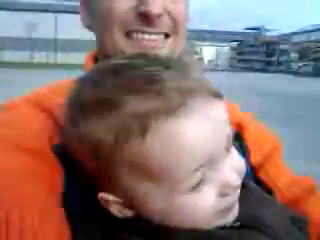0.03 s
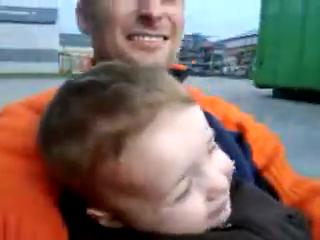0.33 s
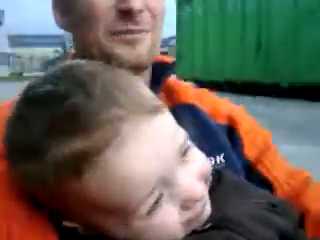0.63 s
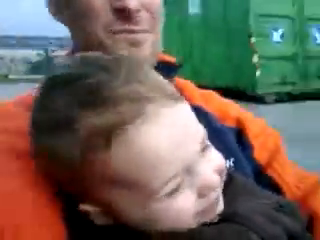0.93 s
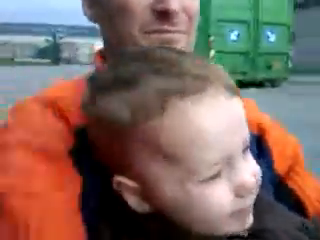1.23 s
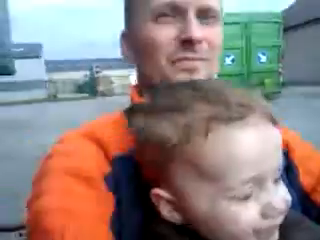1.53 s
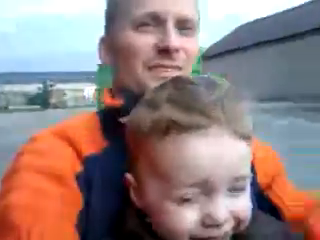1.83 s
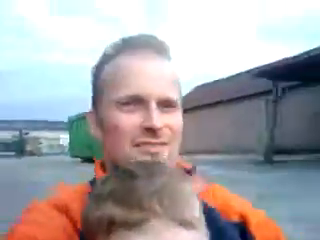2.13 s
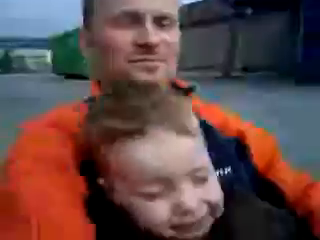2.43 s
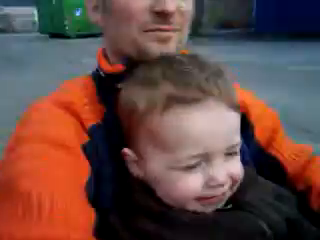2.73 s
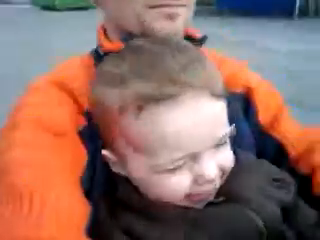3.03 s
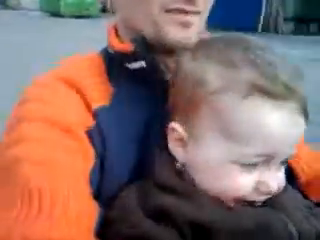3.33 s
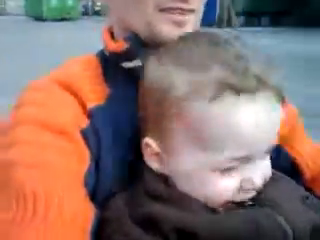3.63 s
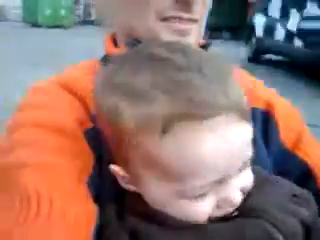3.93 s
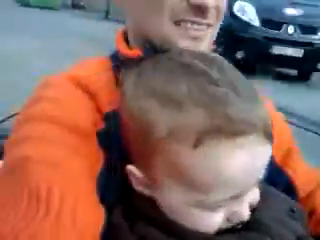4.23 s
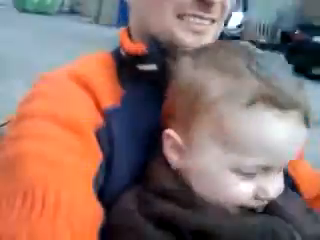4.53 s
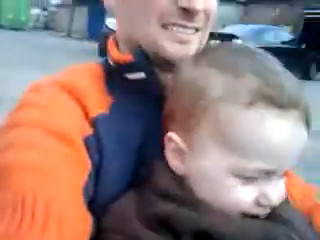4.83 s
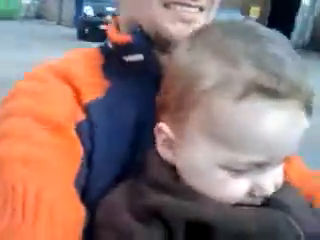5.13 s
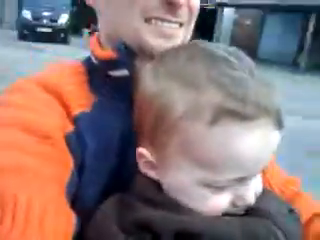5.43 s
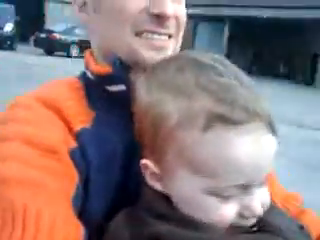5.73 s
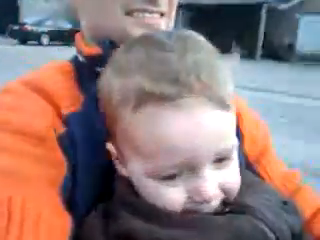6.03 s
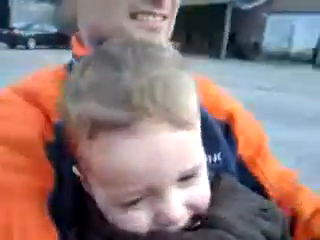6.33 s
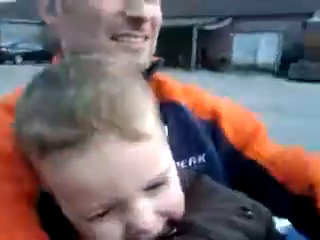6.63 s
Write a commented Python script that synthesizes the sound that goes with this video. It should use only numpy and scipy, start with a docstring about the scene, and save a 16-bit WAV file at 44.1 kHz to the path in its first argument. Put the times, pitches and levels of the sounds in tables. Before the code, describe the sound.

A go-kart rolls over gritty concrete with hiss, buffeting wind and crackles, its tyres screeching in four short, distorted skids.

```python
"""A rolling hiss and buffeting wind, then rasps, crackles and screeching tyres: a go-kart slides round a
concrete yard, heard from the seat through a narrow-band hand-held microphone. Hard wheels hiss and
rumble on grit, driving wind gusts on the microphone, bumps ring the frame. Short rasps and crackles
come singly or in runs: wind crackling on the microphone during the strong gusts, tyre scrub elsewhere.
The tyres screech in four long skids that overload the recorder."""
import sys
import numpy as np
from scipy import signal
from scipy.io import wavfile

SR = 44100
rng = np.random.default_rng(int(sys.argv[2]) if len(sys.argv) > 2 else 0)


def store_wav(level_fs):
    """Save 16-bit WAV to argv[1]."""
    pcm = np.round(np.clip(np.atleast_2d(level_fs), -1, 1) * 32767)
    wavfile.write(sys.argv[1], SR, pcm.T.astype(np.int16))


N = 295028
REST_HZ = 2390   # resonance centre between bursts and between skids


def from_db(db):
    """Decibels to gain."""
    return 10 ** (np.asarray(db) / 20)


def unit_rms(x):
    """Scale to rms 1."""
    return x / np.sqrt(np.mean(x ** 2) + 1e-20)


def curve(rows):
    """Rows of time in seconds and value, interpolated per sample."""
    times_s, values = np.transpose(rows)
    return np.interp(np.arange(N) / SR, times_s, values)


def flutter(rate_hz, depth_db):
    """Random gain of rms 1; its level is low-passed noise with standard deviation depth_db."""
    hop, settle = 20, 4000
    r = np.exp(-2 * np.pi * rate_hz * hop / SR)
    white = rng.standard_normal(N // hop + settle + 2)
    slow = unit_rms(signal.lfilter([1], [1, -2 * r, r * r], white)[settle:])
    drift = np.interp(np.arange(N) / hop, np.arange(len(slow)), slow)
    return unit_rms(from_db(depth_db * drift))


def coloured_noise(spectrum, flicker_db, flicker_hz):
    """Noise bands that each flicker on their own; rms 1."""
    hz, density_db = np.transpose(spectrum)
    edges_hz = np.geomspace(20, 4600, 23)
    white, out = rng.standard_normal((2, N)), 0
    for k, (low, high) in enumerate(zip(edges_hz, edges_hz[1:])):
        band = signal.sosfilt(signal.butter(2, [low, high], "band", fs=SR, output="sos"), white[k % 2])
        gain = from_db(np.interp(np.log(low * high) / 2, np.log(hz), density_db))
        out = out + gain * band * flutter(flicker_hz, flicker_db)
    return unit_rms(out)


def add_resonance(x, centre_hz, width_hz, gain_db):
    """x plus its ringing in a two-pole resonance, steady or moving; rms 1."""
    centre_hz = np.broadcast_to(centre_hz, N)
    r = np.exp(-np.pi * width_hz / SR)
    ring, state, block = np.zeros(N), np.zeros(2), 64
    for i in range(0, N, block):
        poles = [1, -2 * r * np.cos(2 * np.pi * centre_hz[i] / SR), r * r]
        ring[i:i + block], state = signal.lfilter([1, 0, -1], poles, x[i:i + block], zi=state)
    return unit_rms(x + from_db(gain_db) * ring * (1 - r * r) / 2)


def gate(start_s, end_s, edge_s):
    """Sample indices and soft-edged window of one event."""
    at = np.arange(max(int((start_s - edge_s) * SR), 0), min(int((end_s + edge_s) * SR), N))
    inside_s = np.minimum(at / SR - start_s, end_s - at / SR)
    return at, np.clip(inside_s / edge_s + 0.5, 0, 1)


def rolling(hiss_gain_db, rumble_gain_db):
    """Small hard wheels on gritty concrete: grainy hiss with a shrill edge over a low rumble."""
    # Rolling spectra. Each row: frequency in Hz, relative density in dB.
    hiss_spectrum = [(900, -14), (1100, -7.5), (1500, -9.5), (2000, -8.5), (2550, -2.5), (2900, 6.5),
                     (3250, 0), (3550, -8), (4200, -0.5)]
    rumble_spectrum = [(25, -23), (60, -12.5), (150, -8.5), (290, 8.5), (550, -2), (750, -8), (1000, 2),
                       (1500, -8), (3000, -7.5)]
    # Rolling levels. Each row: time in seconds, relative level in dB.
    hiss_levels = [(0, -20), (1.2, -19.5), (2.8, -20.5), (4.0, -18), (5.5, -21), (6.0, -21), (6.69, -23)]
    rumble_levels = [(0, -28.5), (1.1, -26.5), (1.57, -27), (2.8, -24.5), (3.8, -25.5), (4.15, -29),
                     (5.4, -30.5), (5.7, -37.5), (6.69, -35.5)]
    grit = coloured_noise(hiss_spectrum, flicker_db=1.5, flicker_hz=5.6)
    grit *= flutter(rate_hz=97, depth_db=1.7)
    hiss = add_resonance(grit, centre_hz=3277, width_hz=44, gain_db=-0.5)
    hiss *= from_db(curve(hiss_levels) + hiss_gain_db)
    rumble = coloured_noise(rumble_spectrum, flicker_db=2.5, flicker_hz=23)
    rumble *= from_db(curve(rumble_levels) + rumble_gain_db)
    return hiss + rumble


def wind(gain_db):
    """Air over the microphone port: each gust roars at its own pitch; eddies shake all bands together."""
    # Gusts. Each row: start in seconds, length in seconds, relative level in dB, roar centre in Hz.
    gusts = [(0.0, 0.02, -19.5, 550), (0.175, 0.069, -25, 600), (0.811, 0.18, -20.5, 900),
             (1.238, 0.071, -15, 1200), (1.33, 0.13, -13.5, 750), (1.622, 0.32, -15, 600),
             (1.897, 0.15, -12.5, 800), (2.123, 0.47, -15, 420), (2.661, 0.11, -13, 800),
             (2.828, 0.2, -14, 650), (3.142, 0.04, -18.5, 550), (3.269, 0.37, -18, 500),
             (3.929, 0.035, -22.5, 900), (4.203, 0.17, -17, 450), (4.39, 0.55, -20, 430),
             (5.047, 0.17, -17.5, 900), (5.307, 0.019, -21, 500), (5.368, 0.06, -26.5, 450),
             (5.914, 0.056, -20, 500), (6.095, 0.024, -19, 550), (6.178, 0.023, -24, 500)]
    # Wind spectrum. Each row: frequency in Hz, relative density in dB.
    air_spectrum = [(25, -20), (60, -11), (170, -14.5), (300, 0.5), (550, 0), (850, -2), (1400, -4.5),
                    (2300, -4.5), (3300, -16.5), (4200, -5)]
    attack_s, release_s, breeze_db = 0.018, 0.074, -33
    t = np.arange(N) / SR
    flow = np.full(N, from_db(breeze_db))
    centre_hz = np.full(N, np.mean([hz for *_, hz in gusts]))
    for start_s, length_s, level_db, hz in gusts:
        end_s = start_s + length_s
        corners_s = [start_s - attack_s / 2, start_s + attack_s / 2, end_s, end_s + release_s]
        gust = from_db(level_db) * np.interp(t, corners_s, [0, 1, 1, 0])
        centre_hz[gust > flow] = hz
        flow = np.maximum(flow, gust)
    air = coloured_noise(air_spectrum, flicker_db=2.5, flicker_hz=30)
    roar = add_resonance(air, centre_hz, width_hz=450, gain_db=-6)
    eddies = flutter(rate_hz=70, depth_db=2.07)
    return from_db(gain_db) * flow * roar * eddies


def burst_runs():
    """Rasps and crackles in a rough, slightly fading rhythm; returns one row per burst."""
    # Runs. Each row: start in seconds, length in seconds, burst rate in Hz,
    # sounding share of a cycle, relative level in dB, centre in Hz.
    runs = [(0.202, 0.14, 32.5, 0.29, -10.5, 2470), (0.836, 0.12, 58.6, 0.28, -13.5, 2430),
            (1.735, 0.056, 50, 0.3, -9, 1900), (1.871, 0.135, 27, 0.45, -10, 1710),
            (2.138, 0.13, 29, 0.4, -14, 2260), (2.37, 0.087, 27, 0.32, -12.5, 2440),
            (2.539, 0.06, 45, 0.75, -11.5, 2350), (2.886, 0.035, 112, 0.6, -11, 2080),
            (3.1, 0.11, 56.5, 0.5, -10.5, 2940), (4.238, 0.07, 43.6, 0.75, -11, 2930),
            (4.326, 0.095, 31, 0.83, -10, 2700), (4.708, 0.15, 20, 0.55, -9, 2850),
            (4.887, 0.081, 31.8, 0.89, -9.5, 2850), (5.277, 0.075, 33.6, 0.55, -11, 2780)]
    fade_db, spread_db, jitter_cycles, log_stretch = 1.5, 0.14, 0.061, 0.22
    rows = []
    for start_s, length_s, rate_hz, share, level_db, hz in runs:
        for cycle, (late, weak, long) in enumerate(rng.standard_normal((40, 3))):
            progress = cycle / (length_s * rate_hz)
            if progress < 1:
                onset_s = start_s + (cycle + jitter_cycles * late) / rate_hz
                burst_s = min(share * np.exp(log_stretch * long), 1) / rate_hz
                burst_db = level_db - fade_db * progress - spread_db * weak
                rows.append((onset_s, burst_s, burst_db, hz))
    return rows


def rasps_and_crackles(gain_db):
    """Short bursts: wind crackling on the microphone in the strong gusts, tyre scrub elsewhere."""
    # Single bursts. Each row: start in seconds, length in seconds, relative level in dB, centre in Hz.
    single_bursts = [(0.226, 0.014, -8.5, 2430), (0.506, 0.0095, -12, 2350), (0.819, 0.0038, -9, 2800),
                     (0.973, 0.023, -9.5, 2400), (1.211, 0.0063, -14, 3060), (1.245, 0.04, -12.5, 2060),
                     (1.345, 0.023, -11.5, 2200), (1.385, 0.019, -17, 1785), (1.445, 0.0093, -8.5, 2620),
                     (1.505, 0.0071, -11, 1514), (1.626, 0.015, -13, 1900), (1.836, 0.0093, -19, 1800),
                     (2.036, 0.018, -9.5, 2080), (2.087, 0.0095, -9.5, 1780), (2.632, 0.008, -13, 1870),
                     (2.71, 0.0063, -7, 2490), (2.745, 0.034, -11, 2520), (3.226, 0.043, -6.5, 3130),
                     (3.648, 0.019, -10.5, 2800), (3.812, 0.0057, -10.5, 2260), (4.86, 0.0077, -11.5, 3070),
                     (5.005, 0.0049, -8, 2820), (5.028, 0.01, -16, 2550), (5.919, 0.0028, -14.5, 2510),
                     (5.965, 0.011, -9.5, 3270), (6.098, 0.0124, -17, 3030)]
    # Burst spectrum. Each row: frequency in Hz, relative density in dB.
    burst_spectrum = [(25, -11), (70, -10.5), (200, -10), (500, -6), (1000, -3.5), (2000, -3.5),
                      (3100, -1.5), (4200, 0)]
    noise = coloured_noise(burst_spectrum, flicker_db=4, flicker_hz=22)
    noise *= flutter(rate_hz=153, depth_db=0.58)
    envelope, centre_hz = np.zeros(N), np.full(N, float(REST_HZ))
    for start_s, length_s, level_db, hz in [*single_bursts, *burst_runs()]:
        at, window = gate(start_s, start_s + length_s, edge_s=0.0014)
        envelope[at] += from_db(level_db + gain_db) * window
        centre_hz[at] = hz
    return envelope * add_resonance(noise, centre_hz, width_hz=730, gain_db=6)


def bumps(gain_db):
    """Bumps in the concrete ring the frame's low modes, each at a scattered strength."""
    # Jolts. Each row: time in seconds, relative peak in dB.
    jolts = [(0.753, -13), (0.809, -11.5), (0.825, -16), (0.905, -14), (1.12, -13.5), (1.145, -12),
             (3.673, -14)]
    # Frame modes. Each row: frequency in Hz, relative level in dB, T60 in seconds.
    frame_modes = [(253, -8.5, 0.15), (317, 0, 0.092), (413, -18, 0.042), (596, -5, 0.048)]
    times_s, peak_db = np.transpose(jolts)
    spread_db = rng.normal(0, 2.2, (len(jolts), len(frame_modes)))
    out = np.zeros(N)
    for k, (hz, level_db, t60_s) in enumerate(frame_modes):
        impulses = np.full(N, 1e-18)   # floor avoids denormals
        impulses[(times_s * SR).astype(int)] = from_db(peak_db + level_db + gain_db + spread_db[:, k])
        r, w = np.exp(-np.log(1000) / (t60_s * SR)), 2 * np.pi * hz / SR
        out += (-1) ** k * signal.lfilter([0, np.sin(w)], [1, -2 * r * np.cos(w), r * r], impulses)
    return out


def skids(gain_db):
    """Sliding rubber rings tread and casing: a rough, rising screech over the shoulder's deeper scrape."""
    # Long skids. Each row: start in seconds, length in seconds, relative screech level in dB,
    # screech centre at start and at end in Hz, relative scrape level in dB.
    slides = [(2.916, 0.14, -8, 1880, 2300, -15), (3.269, 0.37, 1.5, 2400, 2850, -12.5),
              (4.427, 0.254, -2, 2680, 2830, -13.5), (5.06, 0.195, -9.5, 2170, 2300, -13.5)]
    # Tread and shoulder spectra. Each row: frequency in Hz, relative density in dB.
    scrub_spectrum = [(25, -21), (70, -26.5), (200, -10.5), (500, -1.5), (1000, -1.5), (1900, -1),
                      (3200, 2.5), (4200, 4)]
    scrape_spectrum = [(100, -26.5), (400, -11.5), (800, -3), (1300, 1), (2000, 1.5), (2700, -5.5),
                       (4200, -11)]
    build_s, build_db = 0.01, 14   # swell as grip goes
    force, drag, centre_hz = np.zeros(N), np.zeros(N), np.full(N, float(REST_HZ))
    for start_s, length_s, screech_db, start_hz, end_hz, scrape_db in slides:
        at, window = gate(start_s, start_s + length_s, edge_s=0.0073)
        onset_db = np.interp(at / SR, [start_s, start_s + build_s], [-build_db, 0])
        swell = window * from_db(gain_db + onset_db)
        force[at] += from_db(screech_db) * swell
        drag[at] += from_db(scrape_db) * swell
        centre_hz[at] = np.linspace(start_hz, end_hz, len(at))
    grabs = flutter(rate_hz=130, depth_db=1.5)   # rubber grips and lets go unevenly
    scrub = coloured_noise(scrub_spectrum, flicker_db=1, flicker_hz=16.6)
    casing = add_resonance(scrub, centre_hz=2050, width_hz=170, gain_db=-5)
    screech = force * add_resonance(casing, centre_hz, width_hz=1300, gain_db=4)
    scrape = drag * coloured_noise(scrape_spectrum, flicker_db=1.5, flicker_hz=47)
    return grabs * (screech + scrape)


def overload(x, ceiling):
    """Output stage: linear up to the knee, then crests round off and spray treble."""
    knee = 0.93 * ceiling
    headroom = ceiling - knee
    clean = np.clip(x, -knee, knee)
    return clean + headroom * np.tanh((x - clean) / headroom)


def scene():
    """Kart, tyres and wind at one microphone."""
    bursts_and_skids = rasps_and_crackles(gain_db=2) + skids(gain_db=3.5)
    kart = rolling(hiss_gain_db=2, rumble_gain_db=-1) + bumps(gain_db=-2.5)
    return (kart + bursts_and_skids + wind(gain_db=1.5))[None]


def record(dry):
    """The microphone stage clips, the band is cut to telephone width, the output stage clips again."""
    low_cut_hz, band_hz, skirt_hz, skirt_db, stop_hz, output_hz = 59, 3337, 3753, -30.5, 4450, 15800
    driven = np.clip(dry, -0.81, 0.81)
    driven = signal.sosfilt(signal.butter(2, low_cut_hz, "high", fs=SR, output="sos"), driven)
    band = signal.sosfilt(signal.butter(14, band_hz, fs=SR, output="sos"), driven)
    skirt = signal.sosfilt(signal.butter(14, skirt_hz, fs=SR, output="sos"), driven)
    narrow = band + from_db(skirt_db) * skirt
    narrow = signal.sosfilt(signal.cheby1(12, 0.5, stop_hz, fs=SR, output="sos"), narrow)
    clipped = overload(narrow, ceiling=0.71)
    return signal.fftconvolve(clipped, signal.firwin(401, output_hz, fs=SR)[None], "same")


dry = scene()
out = record(dry)
store_wav(out)
```